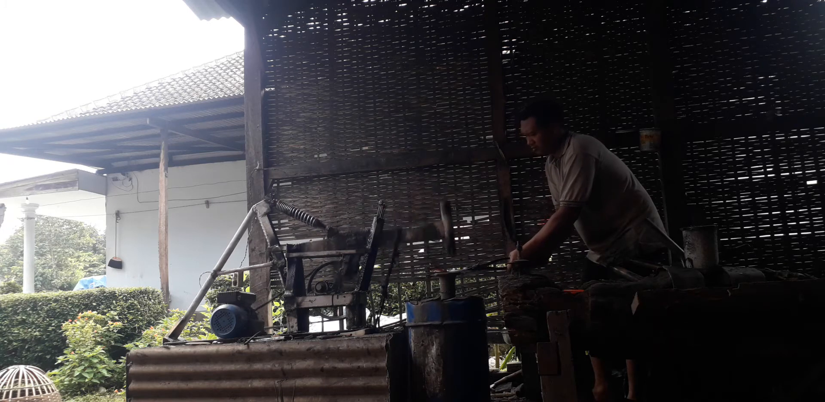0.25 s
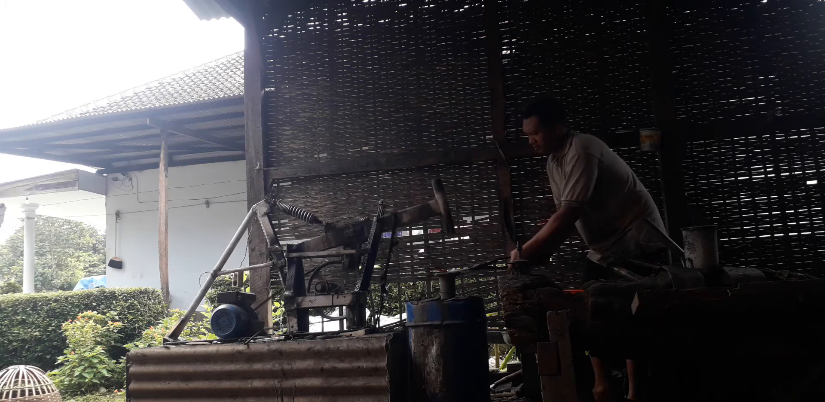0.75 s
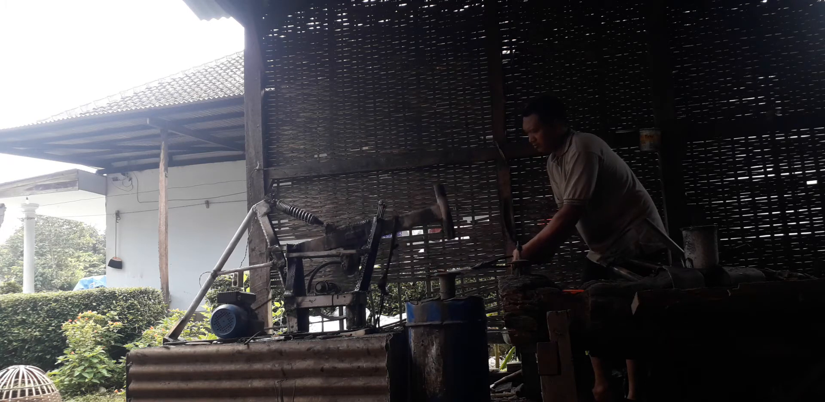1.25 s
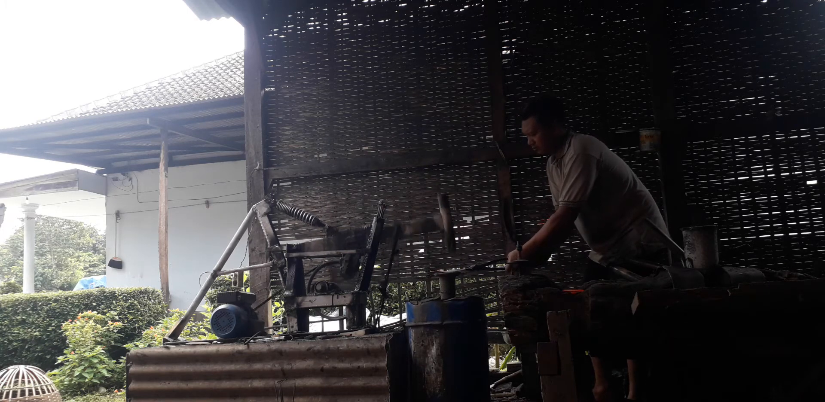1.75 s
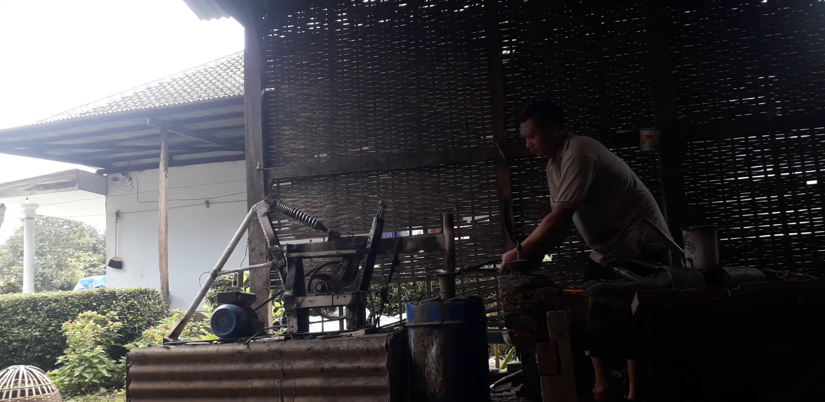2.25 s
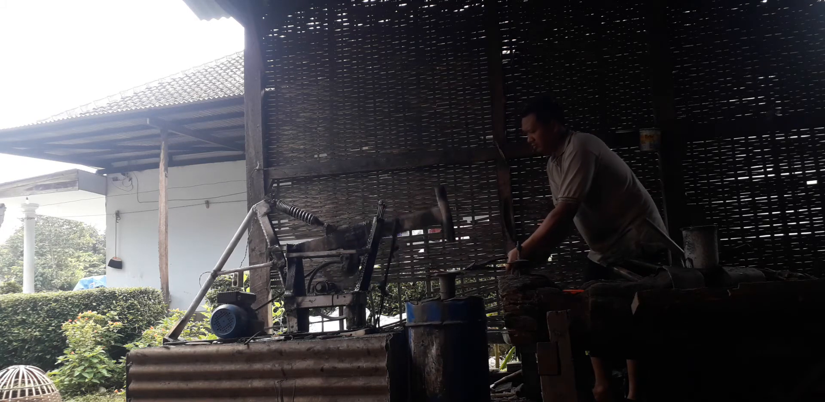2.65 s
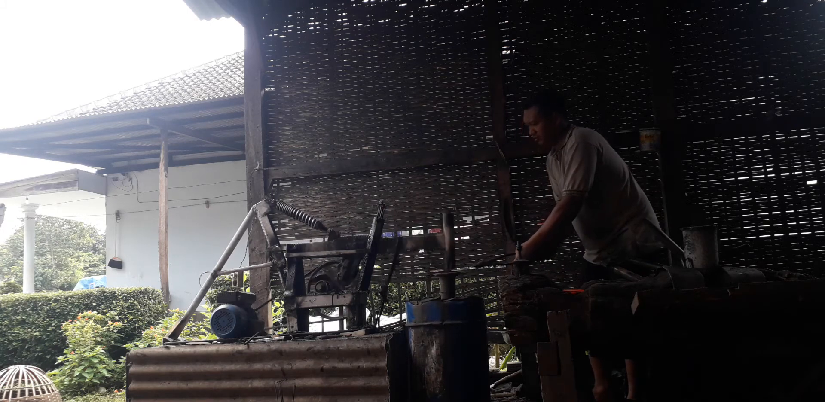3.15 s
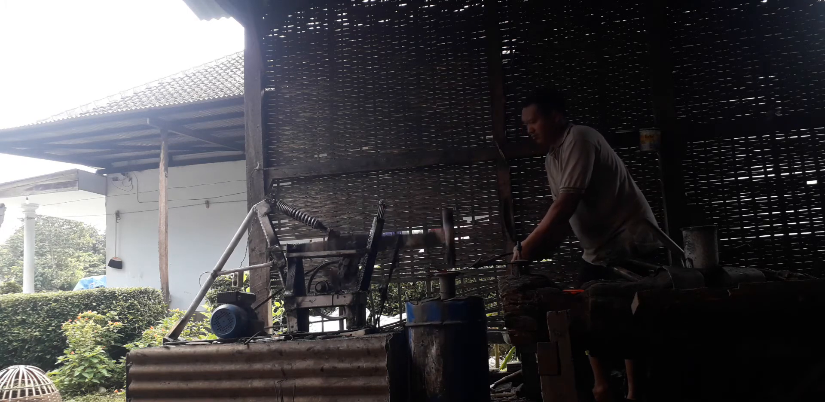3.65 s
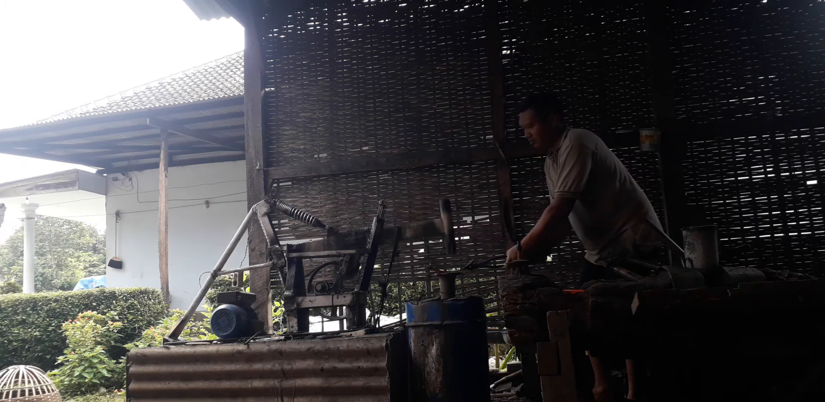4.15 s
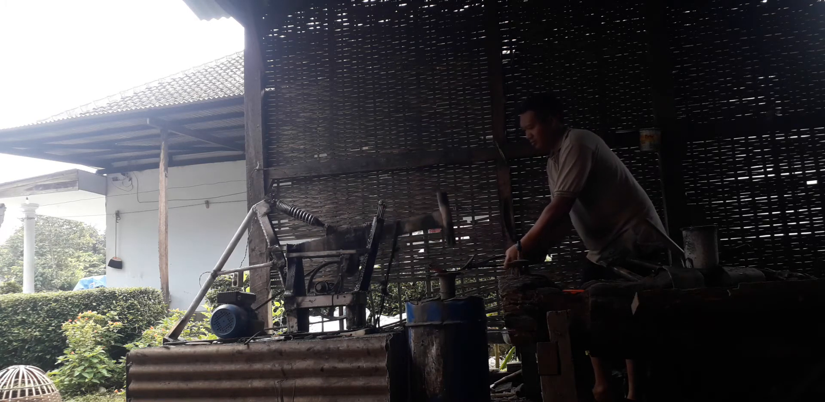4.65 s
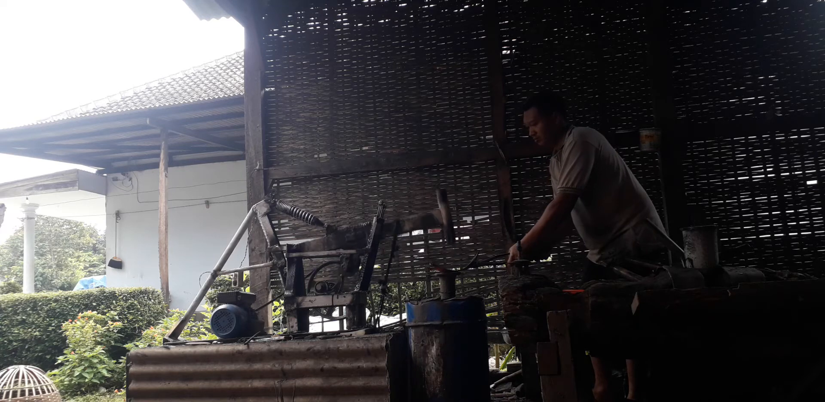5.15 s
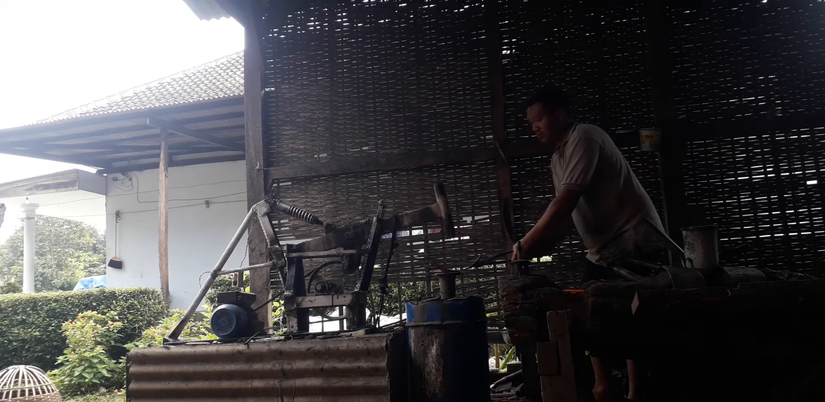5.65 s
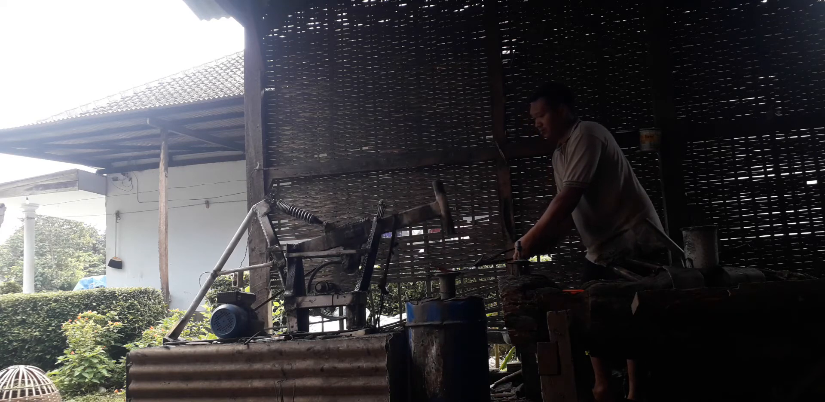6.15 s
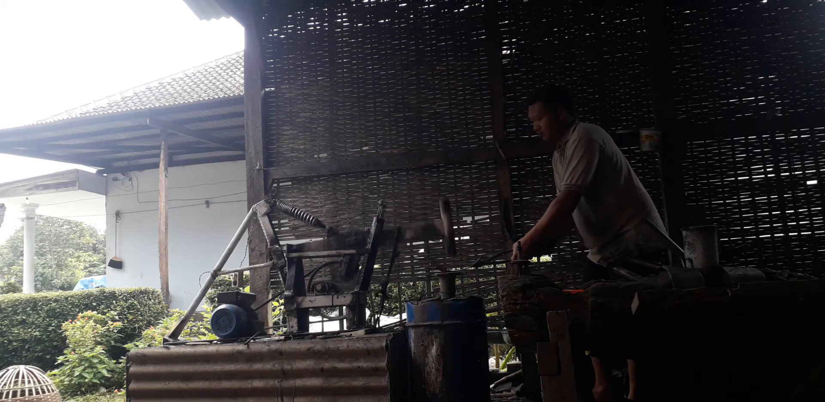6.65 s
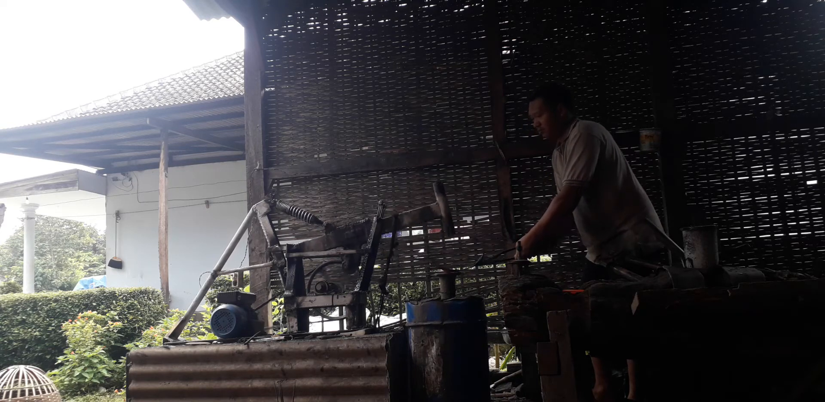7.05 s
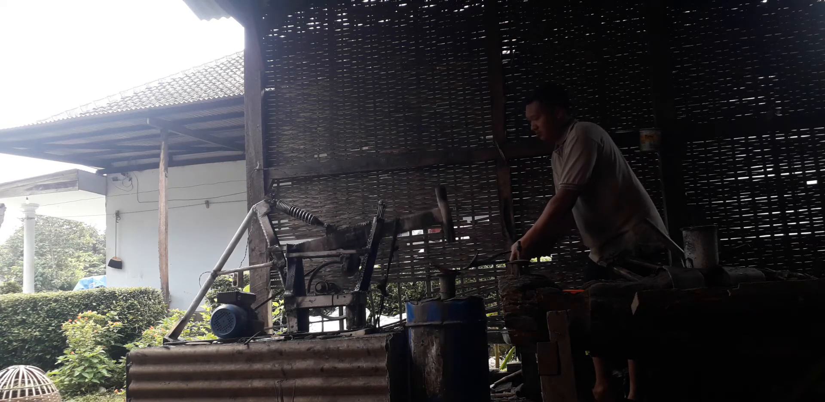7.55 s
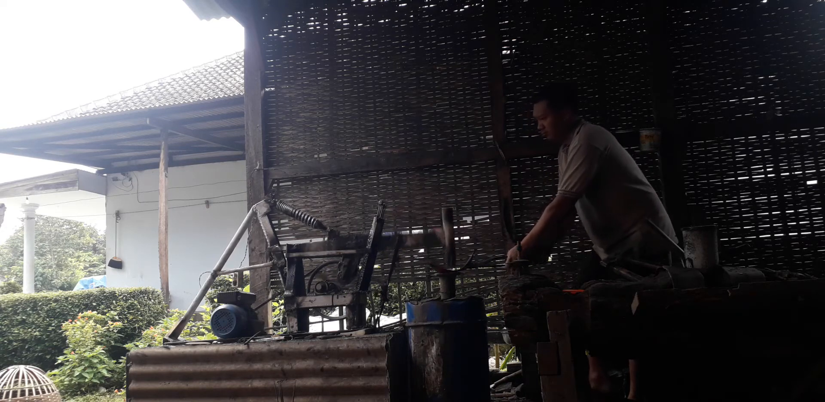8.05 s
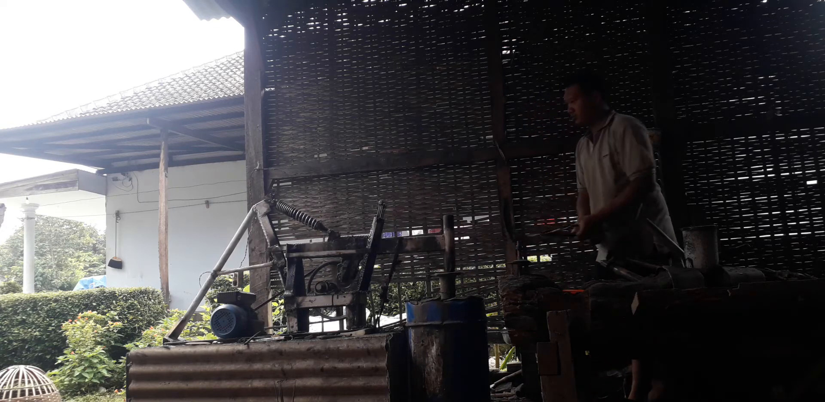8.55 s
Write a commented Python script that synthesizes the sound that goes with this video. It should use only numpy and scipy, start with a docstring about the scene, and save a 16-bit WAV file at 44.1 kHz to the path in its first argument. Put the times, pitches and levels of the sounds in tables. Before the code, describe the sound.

Fast, even metallic hammering in an open shed: sharp cracks, ringing anvil, rattling steel and spring, then softer hard-ringing taps as the motor fades.

```python
"""Open shed, microphone by a motor-driven spring hammer forging hot iron, about four blows a second.
Motor and belt noise runs from the start. Each blow starts with a faint, low thud, then a bright crack;
the anvil and frame ring, loose steel and roof sheet clatter and die away, and a thin high tone sings.
Next the leaf spring rattles at the top of the stroke, and loose parts knock here and there.
The last two blows are lighter, on bare dies with a short hard ring; then the motor noise falls away."""
import sys
import numpy as np
from scipy import signal
from scipy.fft import rfft, irfft
from scipy.io import wavfile

SR = 44100
rng = np.random.default_rng(int(sys.argv[2]) if len(sys.argv) > 2 else 0)


def store_wav(level_fs):
    """Save 16-bit WAV to argv[1]."""
    pcm = np.round(np.clip(np.atleast_2d(level_fs), -1, 1) * 32767)
    wavfile.write(sys.argv[1], SR, pcm.T.astype(np.int16))


N = 387633  # samples, about 8.8 s


def from_db(db):
    """Decibels to gain."""
    return 10 ** (np.asarray(db) / 20)


def rms_one(x):
    """Scale to rms 1."""
    return x / np.sqrt(np.mean(x ** 2) + 1e-20)


def at_hz(points, hz):
    """Read a two-column table on a log-frequency axis."""
    table_hz, values = np.transpose(points)
    return np.interp(np.log(np.maximum(hz, 1)), np.log(table_hz), values)


def ring(clicks, hz, t60):
    """A damped two-pole resonator: a unit click sets a sine of height 1 ringing."""
    radius = from_db(-60 / (t60 * SR))
    angle = 2 * np.pi * hz / SR
    return signal.lfilter([0, np.sin(angle)], [1, -2 * radius * np.cos(angle), radius ** 2], clicks + 1e-18)


def strikes(times, gains):
    """A click train."""
    out = np.zeros(N)
    out[np.round(np.asarray(times) * SR).astype(int)] = gains
    return out


def coloured(x, spectrum, peaks=()):
    """Steady noise or grit shaped by a spectrum and resonance humps; rms 1."""
    hz = np.arange(N // 2 + 1) * SR / N
    shape_db = at_hz(spectrum, hz)
    for centre_hz, width_hz, lift_db in peaks:
        shape_db = shape_db + lift_db / (1 + (2 * (hz - centre_hz) / width_hz) ** 2)
    return rms_one(irfft(rfft(x) * from_db(shape_db), N))


def grit(per_s, spread_db):
    """Dense random contacts of uneven size."""
    size_db = spread_db * np.minimum(rng.exponential(1, N), 5)
    sizes = from_db(size_db) * rng.standard_normal(N)
    return sizes * (rng.random(N) < per_s / SR)


def dying(times, levels_db, t60s, rise_s):
    """Envelope: each event swells and dies exponentially, for half a second at most; powers add."""
    power = np.zeros(N)
    for start_s, level_db, t60 in zip(times, levels_db, t60s):
        start = min(round(start_s * SR), N)
        age = np.arange(min(N - start, SR // 2)) / SR
        envelope = from_db(level_db - 60 * age / t60) * (1 - np.exp(-age / rise_s))
        power[start:start + len(age)] += envelope ** 2
    return np.sqrt(power)


def drift(rate_hz):
    """Slow chance: noise at every 40th sample through a double one-pole low-pass; rms 1."""
    pole = np.exp(-80 * np.pi * rate_hz / SR)
    noise = rng.standard_normal(N // 40 + 2002)
    slow = signal.lfilter([1], [1, -2 * pole, pole ** 2], noise)[2000:]  # skip the filter's settling
    return np.interp(np.arange(N) / 40, np.arange(len(slow)), rms_one(slow))


# motor and belt colour: hz, level_db (per Hz, relative)
MOTOR_COLOUR = [(40, -2), (200, -13), (900, -9), (2300, -12), (3600, -14.5), (8000, -20.5), (12000, -30),
                (16000, -42)]
# motor and belt level, falling as the drive is let go: time_s, level_db
MOTOR_LEVEL = [(0, -47), (4, -47.5), (8.3, -46), (8.5, -47.5), (8.79, -73)]


def motor():
    """Motor and belt: steady coloured noise whose level wanders slightly."""
    level_db = np.interp(np.arange(N) / SR, *np.transpose(MOTOR_LEVEL))
    noise = coloured(rng.standard_normal(N), MOTOR_COLOUR)
    return from_db(level_db + 0.5 * drift(3.2)) * noise


# hammer blows: start_s, clatter_db, tone_db, rattle_delay_s
BLOWS = [(0.0165, -5.5, -41.5, .077), (0.2362, -5.5, -38, 0.075), (0.457, -6.5, -48.5, 0.083),
         (0.677, -6.5, -44, 0.078), (0.8985, -6.5, -55.5, .083), (1.1251, -5, -39.5, .097),
         (1.3463, -6, -33, .11), (1.5838, -5, -33.5, .11), (1.8169, -5, -31, .12),
         (2.0495, -6.5, -42.5, 0.12), (2.2821, -6, -46.5, 0.094), (2.5057, -4.5, -34.5, 0.091),
         (2.7297, -4.5, -29.5, .092), (2.954, -6, -45, 0.11), (3.1833, -5.5, -44, 0.074),
         (3.4137, -5, -42.5, .1), (3.6434, -4, -41, 0.1), (3.8704, -4, -41.5, .11),
         (4.1085, -4.5, -45.5, 0.12), (4.3408, -5.5, -41, 0.13), (4.581, -5.5, -42, 0.069),
         (4.822, -6, -45.5, .12), (5.0626, -6, -29, .13), (5.309, -7, -44.5, 0.12),
         (5.5585, -5.5, -58.5, .13), (5.7944, -4.5, -36.5, 0.1), (6.0267, -4.5, -29, .11),
         (6.2568, -4, -30, .1), (6.482, -3, -48.5, 0.11), (6.707, -5.5, -44.5, 0.11),
         (6.9428, -5.5, -47.5, 0.079), (7.1714, -5.5, -39.5, .081), (7.4034, -5.5, -41.5, .098),
         (7.6351, -4.5, -43.5, 0.12), (7.8559, -5.5, -32.5, .12), (8.089, -7.5, -45, 0.1),
         (8.3855, -12.5, -30.5, .1), (8.6184, -13, -53.5, .085)]
# how far the frame rings below the clatter, uneven, most at the last blows: time_s, below_db
FRAME_BELOW = [(0, 22.5), (1.3, 23), (2.1, 23), (4.8, 23.5), (6.3, 25.5), (6.9, 23), (7.3, 25.5),
               (7.9, 24.5), (8.6, 28.5)]
LIGHT_BELOW_DB = -9.5  # a blow with less clatter than this is light
USUAL_STROKE_S, USUAL_T60_S, T60_PER_STROKE = .23, .3, 1.37
USUAL_DELAY_S, RATTLE_DB, RATTLE_LOSS_DB_PER_S, LIGHT_RATTLE_DB = .1, -26, 141, -44


def blows():
    """Columns: start_s, frame_db, clatter_db, clatter_t60_s, tone_db, rattle_delay_s, rattle_db."""
    start_s, clatter_db, tone_db, delay_s = np.transpose(BLOWS)
    light = clatter_db < LIGHT_BELOW_DB
    # the clatter dies slower when the ram takes longer to come back
    stroke_s = np.append(np.diff(start_s), USUAL_STROKE_S)
    t60 = USUAL_T60_S + T60_PER_STROKE * (stroke_s - USUAL_STROKE_S)
    t60[light] = [die_t60 for die_t60, _, _ in BARE_DIES]
    # the later the spring rattles, the weaker; after the light blows it hardly stirs
    rattle_db = RATTLE_DB - RATTLE_LOSS_DB_PER_S * (delay_s - USUAL_DELAY_S)
    rattle_db = np.where(light, LIGHT_RATTLE_DB, rattle_db)
    frame_db = clatter_db - np.interp(start_s, *np.transpose(FRAME_BELOW))
    return start_s, frame_db, clatter_db, t60, tone_db, delay_s, rattle_db


def contact():
    """A bright crack at first touch, sharper on bare dies; a faint short thud near 860 Hz starts 3 ms before it."""
    start_s, frame_db, clatter_db = blows()[:3]
    crack_db = clatter_db - 10 + 0.32 * (clatter_db - frame_db - 19.5)
    envelope = dying(start_s, crack_db, np.full(len(start_s), .05), rise_s=0.00059)
    crack = coloured(rng.standard_normal(N), SPRING_COLOUR, STEEL) * envelope
    thud = ring(strikes(start_s - .003, from_db(frame_db - 3.5)), 860, 0.057)
    return crack + thud


# anvil block and frame modes: pitch_hz, level_db (against the blow's frame level), t60_s
FRAME_MODES = [(74.2, -15.5, 0.57), (151.3, -10, 0.19), (198.7, -9, 0.3), (249.2, -2, 0.24),
               (333, 4.5, 0.16), (372.7, 0.5, 0.35), (433.3, -7.5, 0.52), (538, -13, 0.37),
               (632, -17, 0.49), (670, -17.5, 0.35), (703, -13, 0.6), (753, -14, 0.46), (770, 1.5, 0.23),
               (869, -5.5, 0.11), (953, -15, 0.22), (926, 1, 0.13), (1020, -16.5, 0.1), (1090, 4, 0.17),
               (1031, 3, 0.18), (1147, -0.5, 0.19), (1190, -9, 0.2), (1322, -8.5, 0.38), (1334, -8, 0.3),
               (1406, 3, 0.067), (1568, 0, 0.3), (1860, -8.5, 0.37), (2006, -10.5, 0.2), (3620, -5, 0.18),
               (3626, -13.5, 0.33)]
# echoes from floor, walls and roof; the nearest adds 2.4 m of path: delay_s, level_db
ECHOES = [(.007, -7.5), (0.0173, -2), (.0265, -8), (.045, -9.5)]


def frame():
    """Every blow strikes the same modes, each a little harder or softer; neighbours swing opposite ways."""
    start_s, frame_db = blows()[:2]
    chance = rng.standard_normal((len(start_s), len(FRAME_MODES)))
    direct = np.zeros(N)
    for k, (hz, level_db, t60) in enumerate(FRAME_MODES):
        gains = from_db(frame_db + level_db + 2.57 * chance[:, k])
        direct += (-1) ** k * ring(strikes(start_s, gains), hz, t60)
    out = direct.copy()
    for delay_s, echo_db in ECHOES:
        lag = round(delay_s * SR)
        out[lag:] += from_db(echo_db) * direct[:-lag]
    return out


# colour of the clatter: hz, level_db (per Hz, relative)
CLATTER_COLOUR = [(40, -23.5), (120, -15), (400, -13.5), (900, -1), (1450, -3), (2250, -9.5), (3600, -3),
                  (5500, -4), (8300, -6), (9600, -12), (13000, -13.5), (16000, -15)]
# clatter decay against pitch: hz, t60_share (of the blow's clatter t60)
FADING = [(60, 1.24), (250, 1.51), (1000, 1), (3000, 0.89), (7000, 0.81), (13000, 0.62)]
# how alike the clatter is from blow to blow: hz, share (0-1)
ALIKE = [(100, .75), (1000, .55), (2200, .4), (4000, .4), (8000, .1)]


def clatter():
    """Shaken steel and its echoes in the shed: grit that dies octave by octave, treble soonest."""
    start_s, _, clatter_db, t60 = blows()[:4]
    spectrum = rfft(coloured(grit(per_s=20000, spread_db=0.57), CLATTER_COLOUR, STEEL))
    octave = np.log2(np.maximum(np.arange(len(spectrum)) * SR / N, 1))
    starts = np.round(np.append(0, start_s) * SR).astype(int)
    latest = np.searchsorted(starts, np.arange(N), "right") - 1
    since_blow = np.arange(N) - starts[latest]
    out = np.zeros(N)
    for centre in range(6, 15):
        centre_hz = 2 ** centre
        # overlapping shares that add to 1
        share = np.cos(np.pi / 2 * np.clip(octave - centre, -1, 1)) ** 2
        band = irfft(spectrum * share, N)
        # the shed answers the lows alike each time; the reversed band supplies the rest
        alike = at_hz(ALIKE, centre_hz)
        band = alike * band[since_blow] + np.sqrt(1 - alike ** 2) * band[::-1]
        rise_s = 0.0026 + 0.11 / centre_hz  # lows build up more slowly
        envelope = dying(start_s, clatter_db, t60 * at_hz(FADING, centre_hz), rise_s)
        out += band * from_db(drift(17)) * envelope
    return out


# steel resonances, heard in dies, clatter, crack, spring and knocks: pitch_hz, width_hz, lift_db
STEEL = [(1940, 410, 5.5), (2477, 62, 3.5), (2910, 56, 5.5), (3305, 310, 3), (3570, 120, 5.5),
         (3757, 43, 7), (3890, 100, 3.5), (4640, 37, 2.5), (4500, 30, 3.5), (6140, 48, 3), (7350, 40, 1.5),
         (7420, 80, -1), (8910, 560, 3.5), (11980, 260, 6.5)]


def dies():
    """The steel resonances also ring clear; strength and pitch vary a little at random from blow to blow."""
    out = np.zeros(N + SR)
    age = np.arange(SR // 4) / SR
    envelope = from_db(-60 * age / 0.18) * (1 - np.exp(-age / 0.0017))
    hz, _, lift_db = np.transpose(STEEL)
    chance = rng.standard_normal((len(BLOWS), 2, len(STEEL)))
    for start_s, frame_db, clatter_db, (uneven, detune) in zip(*blows()[:3], chance):
        # the quieter the frame against the clatter, the louder the dies
        hardness_db = 1.03 * (clatter_db - frame_db - 21.5)
        level_db = clatter_db + hardness_db + at_hz(CLATTER_COLOUR, hz) + lift_db - 20.5 + 2 * uneven
        gains = from_db(level_db) * np.sign(detune)
        modes = gains @ np.sin(2 * np.pi * np.outer(hz * (1 + .004 * detune), age))
        start = round(start_s * SR)
        out[start:start + len(age)] += modes * envelope
    return out[:N]


def clinks():
    """Bolts, washers and linkage pins chatter faintly while the frame still shakes."""
    start_s, _, clatter_db, t60 = blows()[:4]
    shake = dying(start_s, clatter_db - 16.5, 1.1 * t60, rise_s=.03)
    hits = grit(per_s=400, spread_db=1.2) * shake
    pitches_hz = np.geomspace(3400, 8800, 22)
    dealt = rng.integers(0, 22, N)  # which pitch each hit sounds
    return sum(ring(hits * (dealt == k), hz, .04) for k, hz in enumerate(pitches_hz))


TONE_HZ, LIGHT_TONE_HZ, TONE_T60_S = 9938, 10010, 0.52  # a little sharper under the light blows


def high_tone():
    """A lightly damped mode of the dies, stopped by the next blow; with iron between it wavers more."""
    out = np.zeros(N)
    waver = drift(18)
    start_s, _, clatter_db, _, tone_db, _, _ = blows()
    edges = [round(s * SR) for s in start_s] + [N]
    detune = rng.standard_normal(len(BLOWS))
    for k, (start, stop) in enumerate(zip(edges, edges[1:])):
        light = clatter_db[k] < LIGHT_BELOW_DB
        hz = LIGHT_TONE_HZ if light else TONE_HZ + 10 * detune[k]
        age = np.arange(stop - start) / SR
        waver_db = waver[start:stop] * (1 if light else 4)
        envelope = from_db(tone_db[k] + waver_db - 60 * age / TONE_T60_S) * (1 - np.exp(-age / 0.026))
        out[start:stop] = envelope * np.sin(2 * np.pi * hz * age)
    return out


# colour of the spring rattle, also of crack and knocks: hz, level_db (per Hz, relative)
SPRING_COLOUR = [(300, -3), (1000, 10.5), (2300, -5), (3700, 4), (7500, 7.5), (10000, -3.5), (15500, -4)]


def spring():
    """The leaves slap and slide as the ram turns at the top of the stroke: a swell of bright grit."""
    start_s, *_, delay_s, rattle_db = blows()
    leaves = coloured(grit(per_s=15000, spread_db=-1.8), SPRING_COLOUR, STEEL)
    return leaves * dying(start_s + delay_s, rattle_db, np.full(len(start_s), .22), rise_s=0.011)


# loose parts knocking: start_s, ping_db, pitch_hz, crack_db
KNOCKS = [(0.3174, -22, 6160, -24), (1.0114, -35, 3890, -37.5), (1.9374, -33, 3570, -34),
          (2.1674, -33, 7890, -30), (2.3664, -20, 6170, -40.5), (2.5924, -21, 6230, -36.5),
          (2.8454, -32, 3900, -35), (3.2817, -21, 6140, -44), (4.2111, -19, 6160, -21.5),
          (4.4774, -40, 4500, -35), (4.6174, -23, 3590, -20.5), (4.9044, -28, 4390, -21),
          (5.1464, -31, 6560, -24.5), (5.3534, -17, 3754, -22), (5.497, -35, 3600, -39),
          (5.6264, -25, 3403, -24), (5.6979, -31, 3570, -36), (5.9973, -44, 3770, -37),
          (6.1564, -30, 8050, -33.5), (6.8067, -21, 6060, -20), (7.2694, -26, 6160, -35.5),
          (7.3672, -35, 3540, -38), (8.1524, -26, 4000, -36.5), (8.1914, -27, 7090, -36),
          (8.2126, -37, 7140, -21), (8.28, -25, 3680, -29.5), (8.322, -35, 6000, -30),
          (8.6594, -18, 3630, -22), (8.6964, -25, 3720, -48)]


def knocks():
    """Each knock is a short ping at its own pitch on a bright crack with a weaker tail."""
    start_s, _, _, crack_db = np.transpose(KNOCKS)
    pings = sum(ring(strikes([at], [from_db(ping_db)]), hz, .05) for at, ping_db, hz, _ in KNOCKS)
    snap = dying(start_s, crack_db, np.full(len(start_s), .04), rise_s=.0006)
    tail = dying(start_s, crack_db - 5.5, np.full(len(start_s), .18), rise_s=0.0035)
    return pings + coloured(rng.standard_normal(N), SPRING_COLOUR, STEEL) * (snap + tail)


# the light blows land on bare dies, in turn: clatter_t60_s, ring_db, pitch_hz
BARE_DIES = [(.21, -12, 3370), (.3, -11.5, 3800)]


def bare_dies():
    """With no iron between them the dies give a short, hard ring."""
    start_s, _, clatter_db = blows()[:3]
    times = start_s[clatter_db < LIGHT_BELOW_DB] + .0017
    out = np.zeros(N)
    for at, (_, ring_db, hz) in zip(times, BARE_DIES):
        out += ring(strikes([at], [from_db(ring_db)]), hz, 0.053)
    return out


def scene():
    """All sources at the microphone."""
    hammer = contact() + frame() + clatter() + dies() + clinks() + high_tone() + bare_dies()
    return (motor() + hammer + spring() + knocks())[None]


def record(dry):
    """Peaks are rounded, the small microphone drops the deep bass, the top is cut at 15.8 kHz."""
    rounded = .85 * np.tanh(dry / .85)
    thin = signal.sosfilt(signal.butter(3, 50, "high", fs=SR, output="sos"), rounded)
    return signal.sosfilt(signal.ellip(14, .3, 85, 15800, fs=SR, output="sos"), thin)


dry = scene()
out = record(dry)
store_wav(out)
```